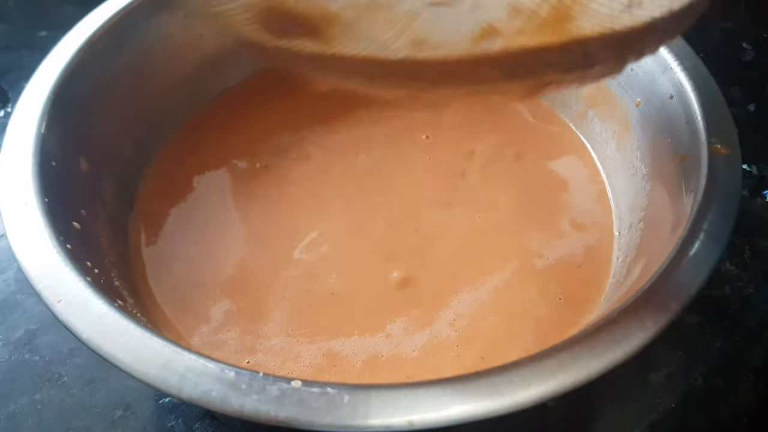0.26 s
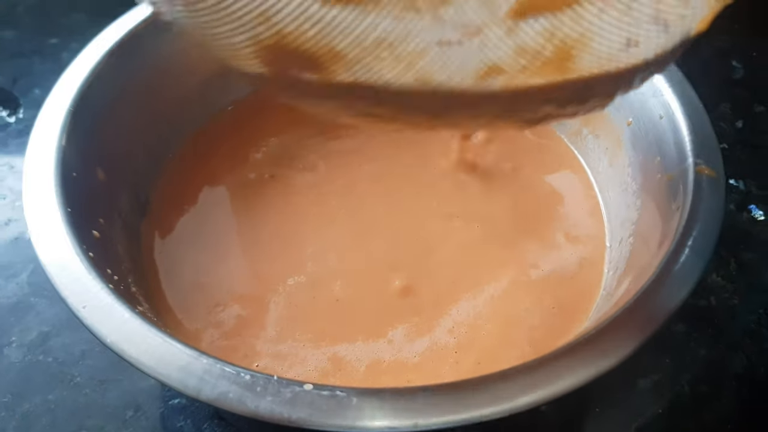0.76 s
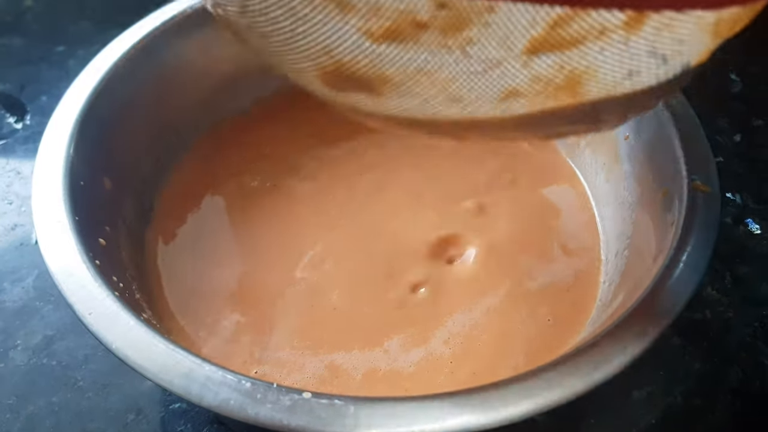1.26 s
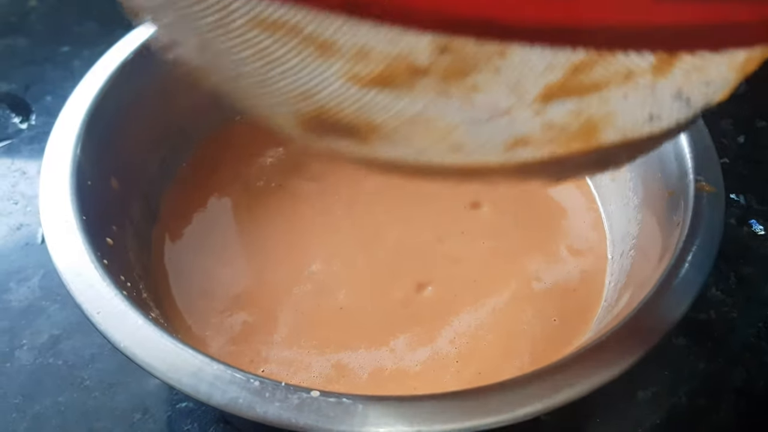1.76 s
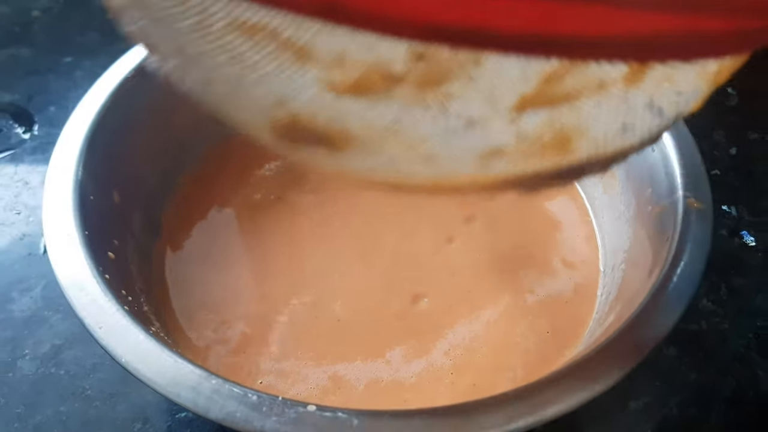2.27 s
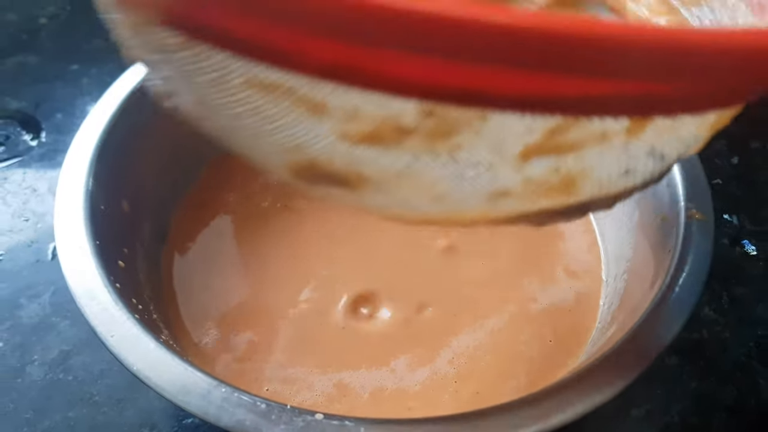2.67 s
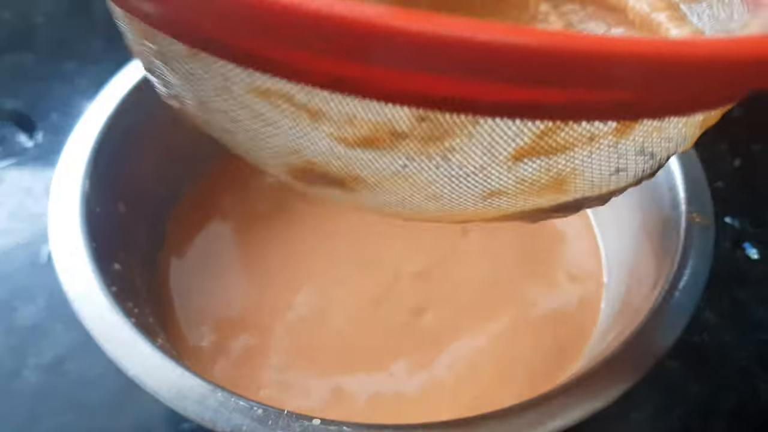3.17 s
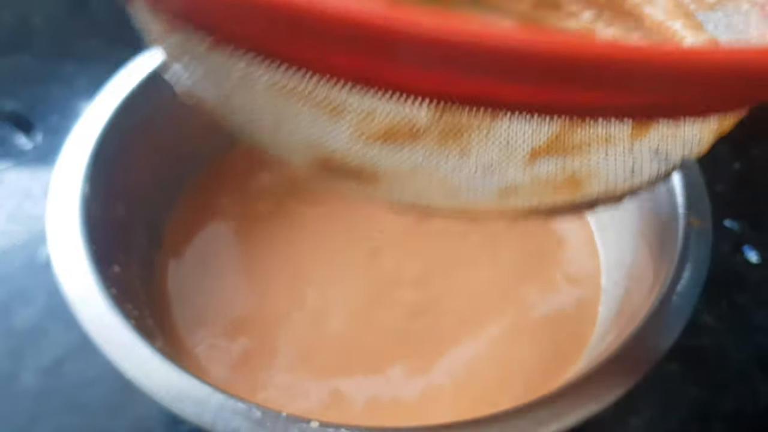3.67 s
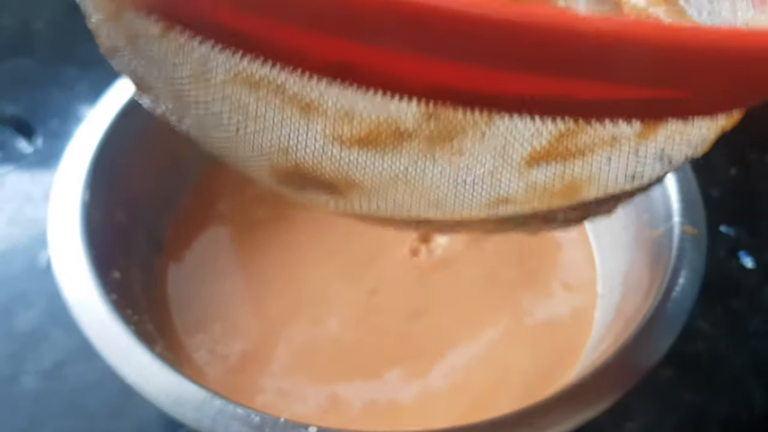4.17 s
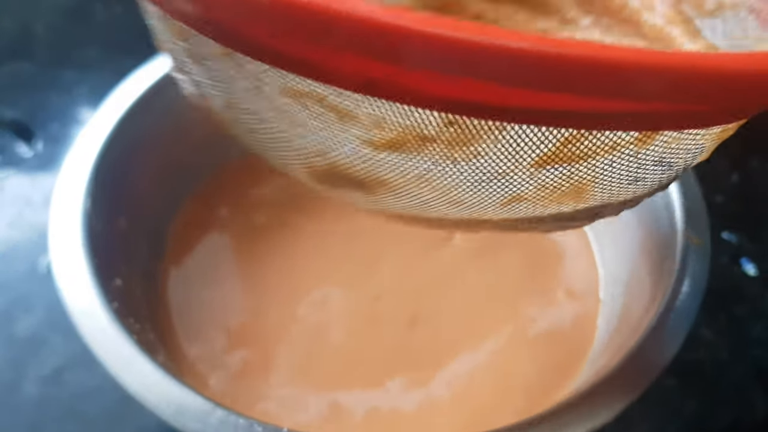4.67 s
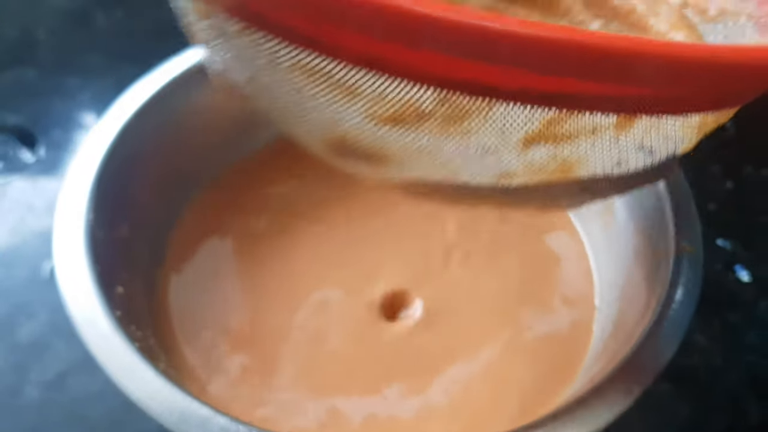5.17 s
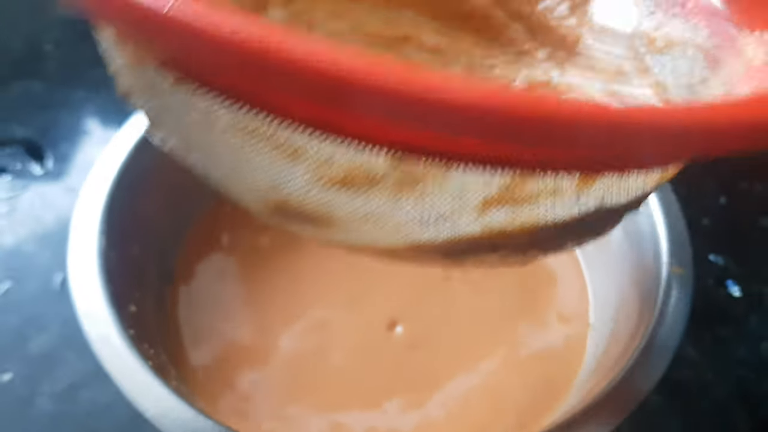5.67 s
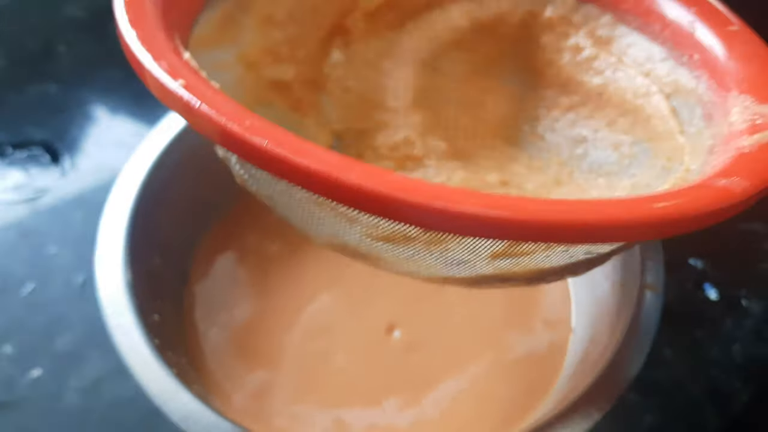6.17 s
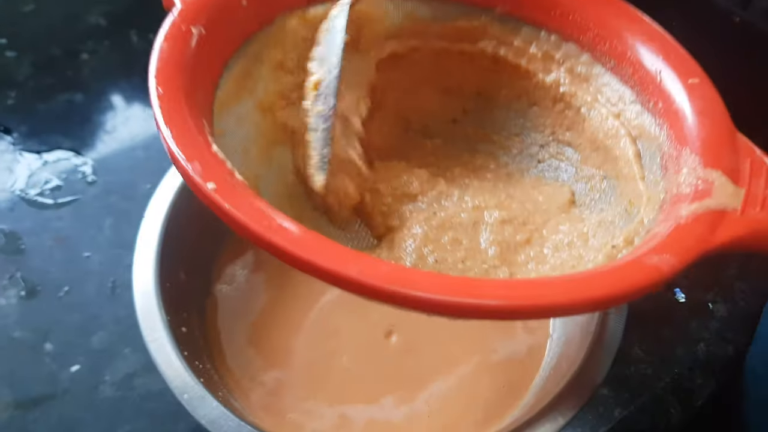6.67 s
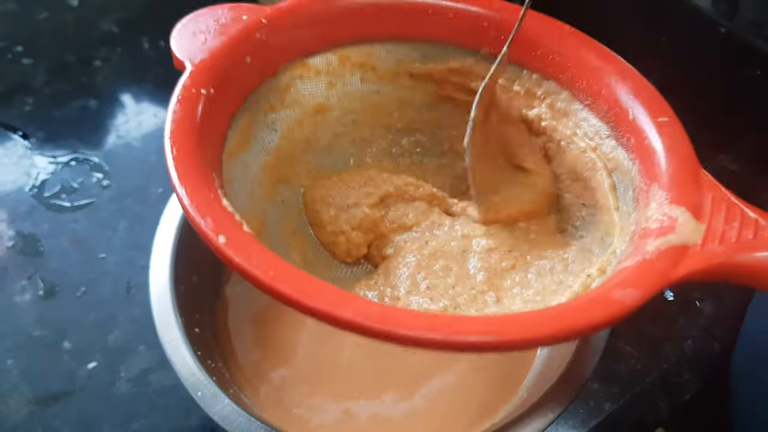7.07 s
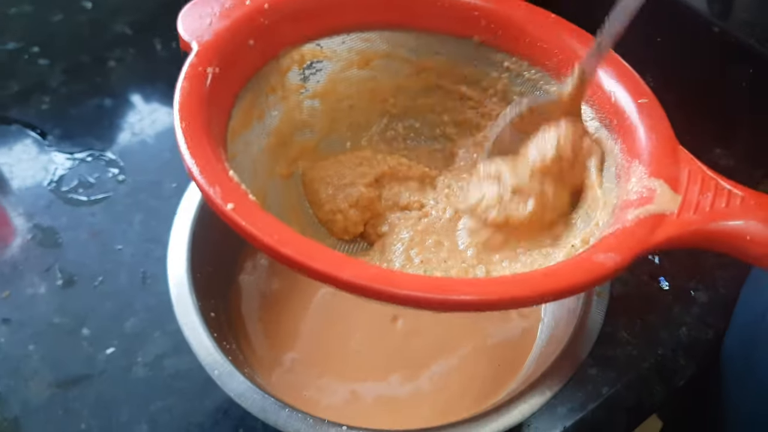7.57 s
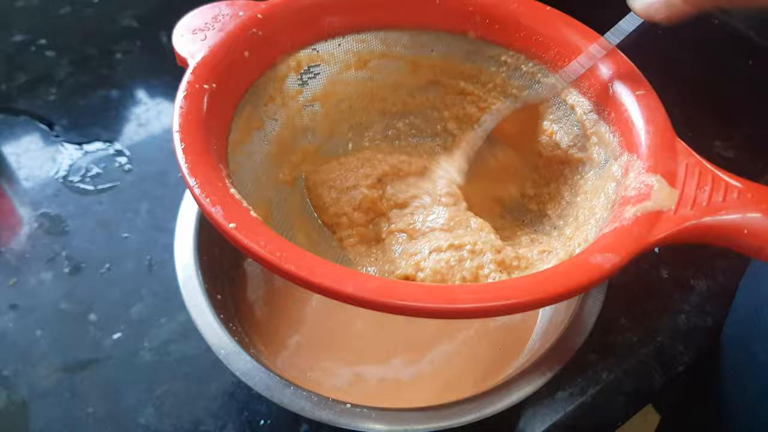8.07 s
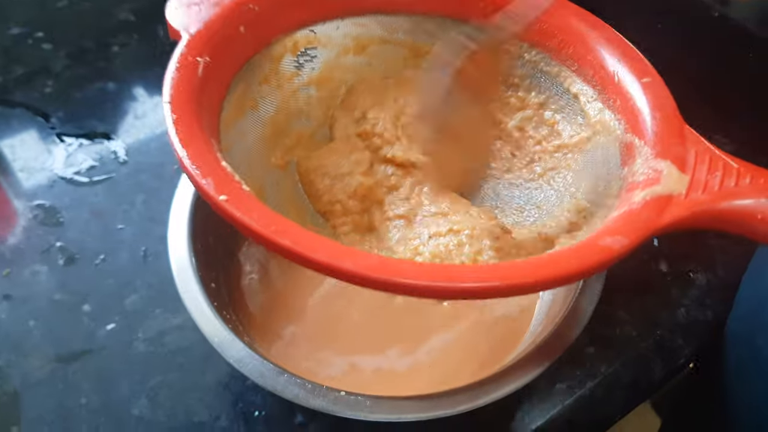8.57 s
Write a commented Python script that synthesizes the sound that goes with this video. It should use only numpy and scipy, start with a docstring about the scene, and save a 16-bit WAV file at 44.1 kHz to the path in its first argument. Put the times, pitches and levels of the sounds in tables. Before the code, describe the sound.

In a small kitchen, a close phone microphone picks up a spoon scraping back and forth in a pulp-filled wire sieve. The zipping, grainy strokes keep a steady rhythm, briefly sharpen with two squeaky chirps, then soften. Later they break into uneven scrapes and short knocks, some ringing brighter on bare mesh. The steel bowl and spoon ring lightly, while faint pulp pops and a low appliance hum lie underneath.

```python
"""Small kitchen: a steel spoon presses thick puree through a wire-mesh strainer over a steel bowl.
About three strokes a second. The edge skips from wire to wire, so each rasp rises and falls in pitch
with its speed. The spoon taps the mesh on landing, bubbles pop in the pulp, bowl and spoon ring.
A phone close by hears it in stereo, over the low hum of an appliance."""
import sys
import numpy as np
from scipy import signal
from scipy.fft import rfft, irfft
from scipy.io import wavfile
from scipy.ndimage import uniform_filter1d, map_coordinates

SR = 44100
rng = np.random.default_rng(int(sys.argv[2]) if len(sys.argv) > 2 else 0)


def file_out(sig):
    """Save sig as 16-bit WAV at sys.argv[1]."""
    # one column per channel
    cols = np.atleast_2d(sig).T
    # limit, then scale
    lim = np.clip(cols, -1, 1)
    pcm = np.round(lim * 32767).astype(np.int16)
    wavfile.write(sys.argv[1], SR, pcm)


N = 388962
TIME = np.arange(N) / SR

# Strokes: touch-down t/s, fastest t/s, rise/s, fall/s, level/dB, grit re level/dB,
# top wire-crossing rate/Hz, unevenness/1, bare-mesh ring/dB, left minus right/dB
SPOON_STROKES = [(0.0, 0.046, 0.11, 0.13, -28, -2.5, 560.0, 0.26, -17.0, 1.5),
                 (0.234, 0.357, 0.099, 0.13, -28, -3, 560.6, 0.24, -9, 1.0),
                 (0.541, 0.646, 0.087, 0.16, -29, -2.5, 481, 0.21, -15, 0),
                 (0.873, 0.977, 0.098, 0.097, -28, -2, 476, 0.13, -15.5, -0.5),
                 (1.169, 1.29, 0.098, 0.1, -27, -2.5, 490.1, 0.12, -12, 0),
                 (1.479, 1.598, 0.095, 0.094, -26.5, -3.5, 473.8, 0.12, -14.0, -2),
                 (1.78, 1.91, 0.095, 0.075, -27, -2.5, 509.4, 0.09, -14, -0.5),
                 (2.094, 2.232, 0.07, 0.049, -23.5, -4, 511.6, 0.05, -13, -0.5),
                 (2.404, 2.541, 0.045, 0.048, -24.5, -2, 975, 0.12, -9.0, 0.0),
                 (2.713, 2.839, 0.058, 0.059, -22, -3, 1000.0, 0.13, -21, -2),
                 (2.95, 2.967, 0.015, 0.024, -40.5, 3, 700.4, 0.31, -7, -1.5),
                 (3.102, 3.164, 0.052, 0.051, -20, -2.5, 782.3, 0.05, -13, 0.5),
                 (3.386, 3.44, 0.058, 0.13, -27.5, -1.0, 609, 0.13, -10.5, 0),
                 (3.654, 3.798, 0.14, 0.078, -32.0, -2.0, 399.8, 0.16, -8.5, -0.5),
                 (3.953, 4.065, 0.14, 0.11, -31.5, -1, 399.6, 0.09, -8.5, -1),
                 (4.249, 4.355, 0.089, 0.1, -28.5, -1.0, 521, 0.14, -9.5, -2.5),
                 (4.534, 4.656, 0.11, 0.08, -30.0, -2.5, 400.0, 0.11, -13, -0.5),
                 (4.793, 4.944, 0.098, 0.11, -30.5, -1.5, 480.3, 0.11, -8, -0.5),
                 (5.127, 5.252, 0.11, 0.14, -29.5, -2.5, 480.0, 0.16, -13, -1),
                 (5.444, 5.533, 0.075, 0.15, -29, -1.5, 801.5, 0.16, -9, -1),
                 (5.701, 5.719, 0.013, 0.024, -39, 5, 697.6, 0.29, -24, -0.5),
                 (5.891, 5.927, 0.069, 0.078, -33.5, -2, 747.3, 0.21, -11, 2),
                 (6.043, 6.051, 0.045, 0.065, -32, -7, 848, 0.13, -26, 0.5),
                 (6.242, 6.303, 0.066, 0.04, -26, -3.5, 945, 0.12, -15, -0.5),
                 (6.369, 6.402, 0.063, 0.043, -31, -1.5, 1194, 0.17, -3.5, -1.5),
                 (6.824, 6.856, 0.022, 0.029, -23.5, 5, 1451, 0.04, -20, 0),
                 (6.883, 6.921, 0.12, 0.078, -24, -3, 797, 0.02, 2, 2.5),
                 (6.958, 6.984, 0.055, 0.035, -29, -6.5, 570, 0, -11, -3),
                 (7.224, 7.246, 0.062, 0.077, -37, -4.5, 479.4, 0.15, -22.0, -3),
                 (7.29, 7.321, 0.045, 0.071, -29.5, -2.5, 801, 0.13, -7, -0.5),
                 (7.291, 7.405, 0.12, 0.055, -23.5, -1, 830.5, 0.1, 7, 0.5),
                 (7.444, 7.478, 0.08, 0.11, -31.5, 0.5, 418, 0.12, -8, -1.5),
                 (7.929, 7.99, 0.086, 0.06, -32, -3.5, 945, 0.3, -16, -2.5),
                 (8.236, 8.338, 0.095, 0.089, -29.5, -1, 723, 0.16, -4.0, -0.5),
                 (8.35, 8.404, 0.06, 0.039, -35, -2.5, 653.7, 0.16, 2, -1),
                 (8.628, 8.7, 0.094, 0.067, -38, -2.5, 430.0, 0, -16.5, -2)]
# Puree-loaded mesh response: f/Hz, level/dB
LOADED_MESH_EQ = [(60, -4), (150, -8), (240, -7), (420, -8), (560, -2), (780, 1), (950, 6), (1150, 1),
                  (1500, -7), (1950, -3), (2350, -13), (3200, -13), (6000, -58.5)]
# Mesh wiped bare, ringing higher: f/Hz, level/dB
BARE_MESH_EQ = [(400, -16), (1000, 8.5), (1350, 2), (1600, 9), (2000, 10.5), (2300, 0.5), (2800, -4),
                (6000, -30)]
# Wire grit spectrum: f/Hz, level/dB
GRIT_EQ = [(900, -37), (2000, -12.5), (2900, 1), (3700, 0), (4800, -0.5), (6200, -1), (7200, -6),
           (8200, -11.5), (9500, -3), (12000, -1), (14000, -2.5), (16000, -14.5)]
# Short accents on the mesh: knocks, and two loud 1 kHz chirps where a stroke peaks.
# t/s, level/dB, mesh f/Hz, treble re level/dB
MESH_ACCENTS = [(0.244, -27, 935, -7.5), (0.545, -33, 950, -6), (1.085, -38.5, 768, 2.5),
                (2.415, -31.5, 944, -4), (2.528, -8.5, 973, -25), (2.824, -7.5, 1059, -25),
                (3.037, -37, 795, -0.5), (3.653, -28, 935, 0), (4.536, -35.5, 935, -4),
                (5.127, -28, 1000, -2), (5.89, -30, 950, -11), (6.051, -19.5, 905, -7),
                (6.063, -18, 804, -4), (6.099, -33.5, 726.5, 1), (6.379, -19.5, 929, -2),
                (6.422, -20.5, 914, 0), (6.772, -23, 549, -7), (6.788, -12.5, 979, -16.5),
                (7.213, -26, 870, -12), (7.411, -18, 704, 1), (7.928, -11.5, 990, -8.5),
                (8.234, -21.5, 653, -9.5), (8.627, -18, 648, -5), (8.786, -38.5, 630, -1.5)]
# Steel-on-wire tick spectrum, also used for pops: f/Hz, level/dB
TICK_EQ = [(250, -26), (700, 12), (2000, 1.5), (4500, 0.5), (8000, -13.5), (12000, -6), (16000, -15)]
# Bowl and spoon modes: f/Hz, level/dB, t60/s
STEEL_MODES = [(558.6, -9.5, 0.44), (787.7, -8.5, 0.18), (937, -16, 0.0794), (1340, -30.5, .2),
               (1534, -12.5, 0.069), (2000, -28, 0.16), (2960, -58, .2), (3480, -32.5, 0.11),
               (4570, -32, 0.39)]
# Strainer at the microphones, left minus right: f/Hz, level/dB
LEFT_BIAS_EQ = [(100, 3.5), (400, 2.5), (750, 0.5), (1300, 7), (2300, 2.5), (4500, 4.5), (8500, 8.5),
                (15000, 3.5)]
# Appliance tones: f/Hz, level/dB
HUM_TONES = [(52.7, -45), (264, -58), (307, -68), (398, -61), (528, -72.5)]
# Second low drone: peak t/s, rise/s, fall/s, f/Hz, level/dB
DRONE_PEAKS = [(1.2, 2.2, 2, 62.9, -41.5), (5.55, 0.6, 2.2, 61.8, -43)]
# Room noise spectrum: f/Hz, level/dB
ROOM_NOISE_EQ = [(25, -12), (50, -17.5), (95, 4), (160, -12.5), (280, -7), (450, -13), (900, -24),
                 (2000, -26.5), (4500, -37), (8000, -75), (16000, -76)]


def rasp(smear_db=-4, grit_db=-1.5, burst_wires=0.81, grain_db=1.5, flutter_db=1.3, catch_db=1.14,
         skim_range_hz=(300, 650), heave_hz=170):
    """Slips shake the mesh, each with a burst of grit; two partly correlated channels."""
    body_force, grit_force = stroke_forces()
    rate_hz, uneven, bare_db = spoon_motion()
    slips, phase = wire_slips(rate_hz, uneven)
    flutter = undb(flutter_db * walk(70))
    catch = undb(catch_db * walk(35))  # lumps under the edge
    bursts = np.exp(-phase / burst_wires) * undb(grain_db * walk(1500))
    bare_gain = undb(bare_db)
    skim = np.interp(rate_hz, skim_range_hz, [0, 1])
    heave_lowpass = signal.butter(1, heave_hz, fs=SR, output="sos")
    pulp, grit = rng.standard_normal((2, N))
    channels = []
    for own_pulp, own_grit in rng.standard_normal((2, 2, N)):
        smear = colour(pulp + 0.5 * own_pulp, [(100, 5.5), (400, 4.0), (900, 8.5)])
        drive = slips + undb(smear_db) * np.sqrt(uneven * 10) * smear
        drive -= skim * signal.sosfilt(heave_lowpass, drive)  # a fast edge no longer heaves the mesh
        loaded = steady(colour(drive, LOADED_MESH_EQ))
        bare = steady(colour(drive, BARE_MESH_EQ))
        body = (loaded + bare_gain * bare) / np.sqrt(1 + bare_gain ** 2)
        wires = unit(colour(bursts * (grit + own_grit), GRIT_EQ))
        channels.append(flutter * (catch * body_force * body + undb(grit_db) * grit_force * wires))
    return np.array(channels)


def stroke_forces(landing_s=0.003, body_drop_db=18.5, grit_drop_db=20.5, settle_db_per_s=49):
    """Drive on mesh and grit: light drag, push, one late stall, then pulp creeping through."""
    body_power, grit_power = np.zeros((2, N))
    for touch_s, peak_s, rise_s, fall_s, db, grit_db, *_ in SPOON_STROKES:
        span = slice(int(touch_s * SR), int((peak_s + 1) * SR))
        t = TIME[span]
        distance = peak_distance(peak_s, rise_s, fall_s)[span]
        landed = np.clip((t - touch_s) / landing_s, 0, 1) ** 2
        pushing = t < peak_s
        body_arch = undb(db - body_drop_db * distance ** np.where(pushing, 1.8, 1.92))
        grit_arch = undb(db + grit_db - grit_drop_db * distance ** np.where(pushing, 1.72, 1.65))
        settled_db = settle_db_per_s * (t - peak_s)
        body_floor = undb(np.where(pushing, -46.5, -50 - settled_db))  # drag, then creep
        grit_floor = undb(np.where(pushing, -51, -58.5 - settled_db))
        stall = ~pushing * undb(db - 7.5) * np.exp(-((distance - 0.698) / 0.15) ** 2)
        body_power[span] += landed * (body_arch ** 2 + stall ** 2 + body_floor ** 2)
        grit_power[span] += landed * (grit_arch ** 2 + grit_floor ** 2)
    return np.sqrt(body_power), np.sqrt(grit_power)


def spoon_motion(creep_hz=195., slowest=.25, reach=1.05, brake_s=.095, min_uneven=0.045):
    """The hand speeds up and brakes: wire-crossing rate, unevenness, bare-mesh ring."""
    rate_hz, uneven, bare_db = np.full(N, creep_hz), np.full(N, .35), np.full(N, -16.)
    for _, peak_s, rise_s, fall_s, _, _, top_hz, rough, ring_db, _ in SPOON_STROKES:
        distance = peak_distance(peak_s, rise_s, min(fall_s, brake_s)) / reach
        stroke_hz = top_hz * (slowest + (1 - slowest) * np.cos(np.pi / 2 * distance))
        leads = (distance < 1) & (stroke_hz > rate_hz)  # on overlap the faster push wins
        rate_hz[leads] = stroke_hz[leads]
        uneven[leads] = max(rough, min_uneven)
        bare_db[leads] = ring_db
    return rate_hz, uneven, uniform_filter1d(bare_db, SR // 100)


def wire_slips(rate_hz, uneven, scatter_db=2.0, weave_db=2.0, wobble=.04, release_wires=0.056):
    """The edge snaps past each wire, every second one higher: force, phase between wires."""
    count = 8192
    stretch, strength = rng.standard_normal((count, 2)).T
    height_db = scatter_db * strength + weave_db * (-1.) ** np.arange(count)
    rate_hz = rate_hz * np.exp(wobble * walk(70))
    wire = (np.cumsum(rate_hz) / SR).astype(int) % count
    travel = np.cumsum(rate_hz * np.exp(uneven * stretch[wire])) / SR
    phase = travel % 1
    snap = np.exp(-phase / release_wires) - release_wires
    return unit(snap * undb(height_db[travel.astype(int) % count])), phase


def taps(touch_db=-43, touch_hz=810, touch_treble_db=-1, rise_s=0.0015, thud_db=-3, tick_db=4):
    """Landings and accents: a few puree-damped mesh cycles plus a tick; light ones scuff longer."""
    thuds, ticks = np.zeros((2, N + SR))
    t = np.arange(SR // 10) / SR
    touches = [(s, touch_db, touch_hz, touch_treble_db) for s, *_ in SPOON_STROKES if s > 0]
    for start_s, db, hz, treble_db in touches + MESH_ACCENTS:
        span = slice(int(start_s * SR), int(start_s * SR) + len(t))
        t60_s = np.interp(db, [-32, -17], [0.051, 0.016])
        tick_envelope = fade(t, t60_s) - fade(t, t60_s / 10)
        thuds[span] -= undb(db) * np.sin(2 * np.pi * hz * t) * t / rise_s * np.exp(1 - t / rise_s)
        ticks[span] += undb(db + treble_db) * rng.standard_normal(len(t)) * tick_envelope
    return (undb(thud_db) * thuds + undb(tick_db) * colour(ticks, TICK_EQ))[:N]


def pulp_pops(pops_per_s=60, gain_db=-27, scatter_db=4, linger_s=0.13):
    """Tiny bubbles burst in the squeezed pulp, louder around each stroke."""
    _, grit_force = stroke_forces()
    squeeze = np.maximum(uniform_filter1d(grit_force, int(linger_s * SR)), 0) ** 0.19
    pops = rng.random(N) < pops_per_s / SR
    size = np.minimum(rng.exponential(size=N), np.pi)
    return undb(gain_db) * colour(squeeze * pops * undb(scatter_db * size), TICK_EQ)


def bowl_echoes(x, gain_db=-7.0, lags_s=(.0005, .0009, .0015), drift=0.2838):
    """Spoon and bowl reflect treble over paths that shift with the hand."""
    bright = undb(gain_db) * colour(x, [(300, -14), (1000, -8.5), (2500, 2.5), (7000, 1.5), (14000, 4)])
    return x + sum(np.interp(TIME - lag_s * np.exp(drift * walk(5)), TIME, bright) for lag_s in lags_s)


def steel_ring(x, gain_db=-5.5):
    """Narrow steel modes pick up the scraping and ring on."""
    t = np.arange(SR // 2) / SR
    modes = sum(undb(db) * np.sin(2 * np.pi * hz * t) * fade(t, t60_s) / np.sqrt(t60_s)
                for hz, db, t60_s in STEEL_MODES)
    return convolve(x, undb(gain_db) * modes / np.sqrt(SR))


def kitchen(x, counter_db=-13, counter_t60_s=0.043, room_db=-19, room_t60_s=0.34):
    """Direct sound, quick counter reflections, small-room tail."""
    t = np.arange(SR // 2) / SR
    counter = rng.standard_normal(len(t)) * fade(t, counter_t60_s) * (t > .0006)
    room = rng.standard_normal(len(t)) * fade(t, room_t60_s) * (t > .008)
    early = convolve(x, counter / np.linalg.norm(counter))
    tail = convolve(x, room / np.linalg.norm(room))
    tail = colour(tail, [(200, 3.5), (4500, 8.5), (9000, 2.5), (16000, -12.5)])
    return x + undb(counter_db) * early + undb(room_db) * tail


def appliance_hum(waver_db=1, jitter_rad=0.12, drop_db=17.5):
    """Wavering tones; a second drone swells twice and beats against them."""
    drone = sum(undb(db - drop_db * peak_distance(*timing_s) ** 1.1) * np.sin(2 * np.pi * hz * TIME)
                for *timing_s, hz, db in DRONE_PEAKS)
    hum = sum(undb(db + waver_db * walk(3.6)) * np.sin(2 * np.pi * hz * TIME + jitter_rad * walk(6.5))
              for hz, db in HUM_TONES)
    return np.sqrt(2) * (hum + drone)


def background(noise_db=-52, side_db=-8, left_bias_db=2.0):
    """Hum over faint room noise, both louder on the left."""
    hum = appliance_hum()
    mid, side = (unit(colour(noise, ROOM_NOISE_EQ)) for noise in rng.standard_normal((2, N)))
    sign = np.array([[1], [-1]])
    room_noise = undb(noise_db) * (mid + undb(side_db) * sign * side)
    return (hum + room_noise) * undb(sign * left_bias_db / 2)


def undb(db):
    """Decibels to gain."""
    return 10 ** (np.asarray(db) / 20)


def unit(x):
    """Scale to rms 1."""
    return x / np.sqrt(np.mean(x ** 2))


def steady(x):
    """Scale to rms 1 over a sliding 50 ms."""
    return x / np.sqrt(uniform_filter1d(x ** 2, SR // 20) + 1e-12)


def convolve(x, response):
    """Apply an impulse response, same length out."""
    return signal.fftconvolve(x, response)[:len(x)]


def colour(x, points, size=2048):
    """Minimum-phase filter through (f/Hz, level/dB) points."""
    hz, db = np.transpose(points)
    grid_hz = np.maximum(np.fft.rfftfreq(size, 1 / SR), 1)
    gain = undb(np.interp(np.log(grid_hz), np.log(hz), db))
    cepstrum = irfft(np.log(gain))
    cepstrum[1:size // 2] *= 2
    cepstrum[size // 2 + 1:] = 0
    return convolve(x, irfft(np.exp(rfft(cepstrum))))


def walk(rate_hz):
    """Random levels joined by ramps, rms 1."""
    hold = max(int(SR / rate_hz), 1)
    steps = np.repeat(rng.standard_normal(N)[:N // hold + 1], hold)
    return unit(uniform_filter1d(steps, hold)[:N])


def fade(t, t60_s):
    """Exponential decay, 60 dB down at t60_s."""
    return np.exp(-np.log(1000) * t / t60_s)


def peak_distance(peak_s, rise_s, fall_s):
    """Distance from a peak: in rise times before, fall times after."""
    return np.where(TIME < peak_s, (peak_s - TIME) / rise_s, (TIME - peak_s) / fall_s)


def scene(right_lag_s=.00012, lag_swing_s=.00007):
    """Strainer nearer the left microphone: right is softer and later, varying as the spoon roams."""
    _, peak_s, *_, balance_db = np.transpose(SPOON_STROKES)
    sway_db = np.interp(TIME, peak_s, balance_db)
    transients = taps() + pulp_pops()
    channels = []
    for scrape, sign in zip(rasp(), (1, -1)):
        source = bowl_echoes(scrape + transients)
        in_room = kitchen(source + steel_ring(source))
        side_eq = [(hz, sign * db / 2) for hz, db in LEFT_BIAS_EQ]
        channels.append(colour(in_room, side_eq) * undb(sign * sway_db / 2))
    delayed_s = TIME - right_lag_s - lag_swing_s * walk(3)
    channels[1] = map_coordinates(channels[1], [delayed_s * SR])
    return np.array(channels) + background()


def record(dry, cutoff_hz=16200):
    """The phone cuts the top of the treble."""
    return signal.sosfilt(signal.ellip(10, .2, 80, cutoff_hz, fs=SR, output="sos"), dry)


dry = scene()
out = record(dry)
file_out(out)
```